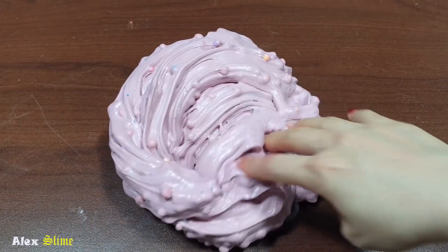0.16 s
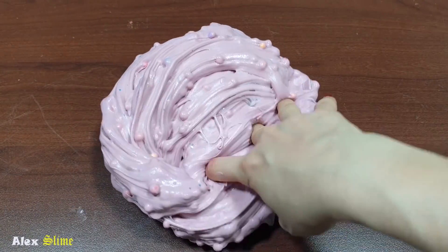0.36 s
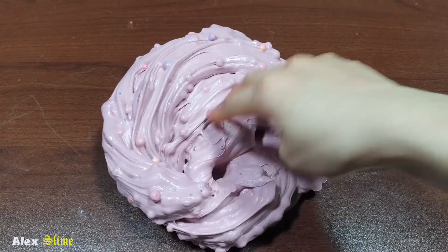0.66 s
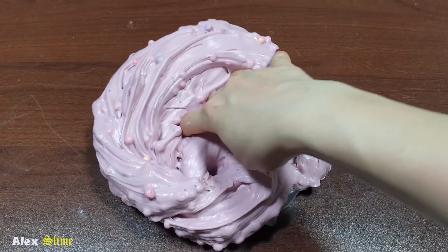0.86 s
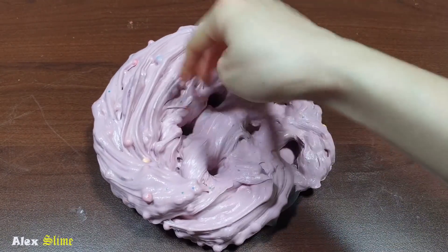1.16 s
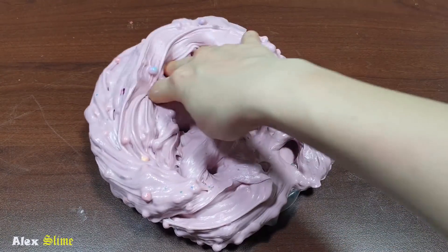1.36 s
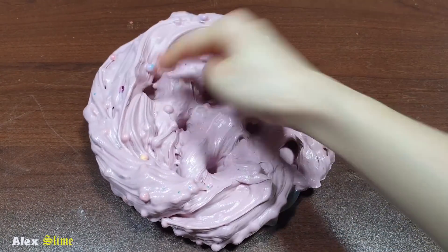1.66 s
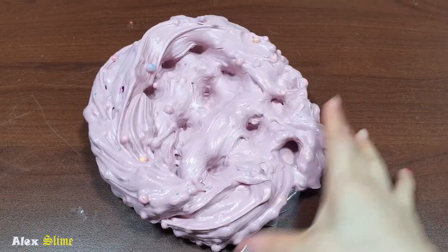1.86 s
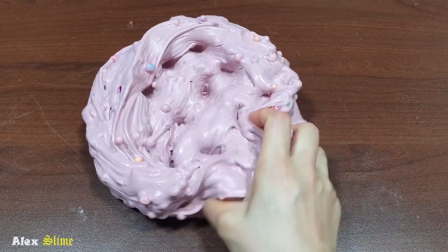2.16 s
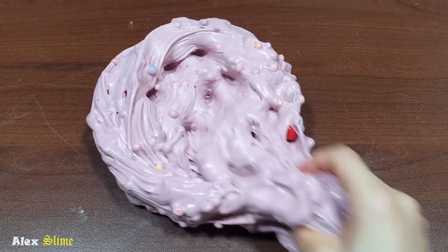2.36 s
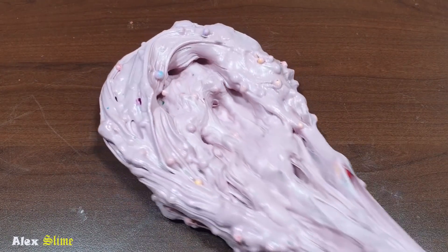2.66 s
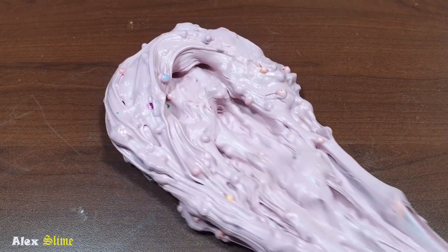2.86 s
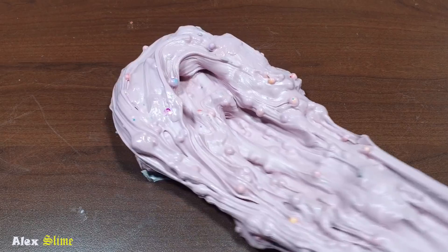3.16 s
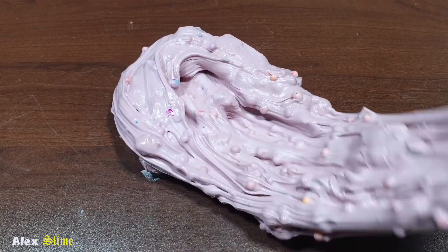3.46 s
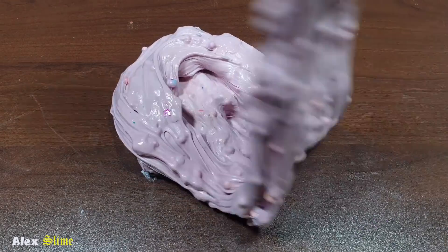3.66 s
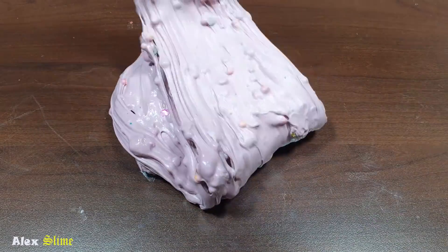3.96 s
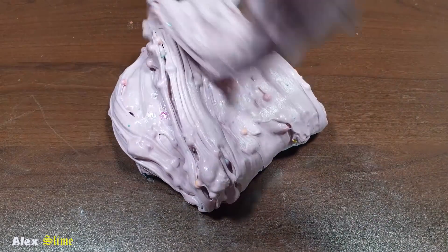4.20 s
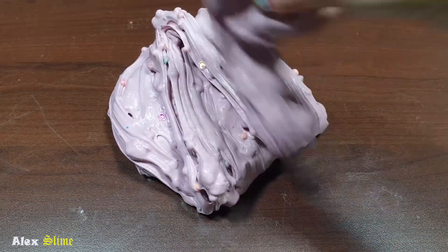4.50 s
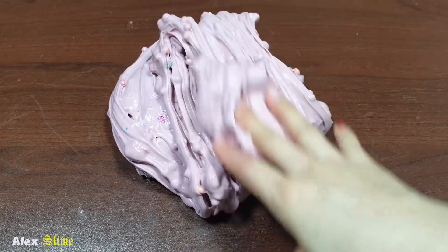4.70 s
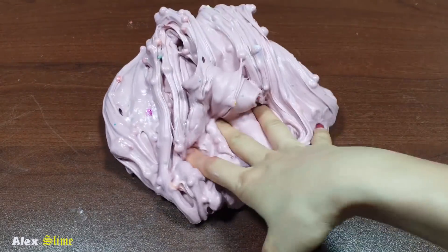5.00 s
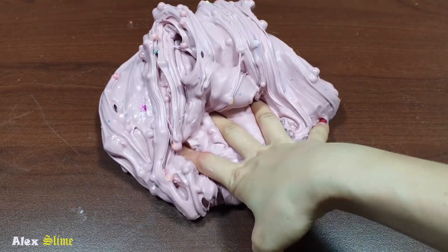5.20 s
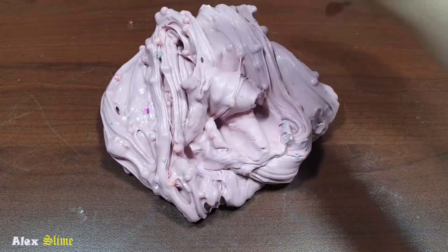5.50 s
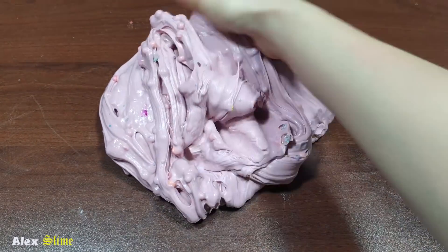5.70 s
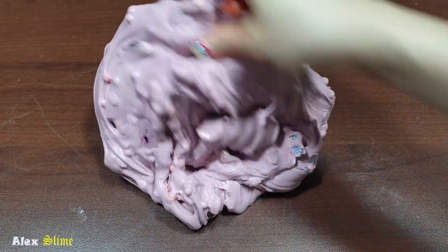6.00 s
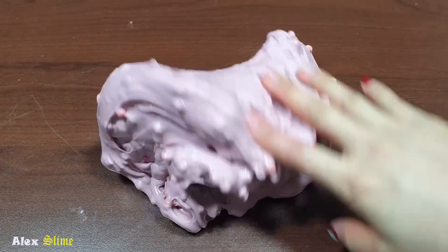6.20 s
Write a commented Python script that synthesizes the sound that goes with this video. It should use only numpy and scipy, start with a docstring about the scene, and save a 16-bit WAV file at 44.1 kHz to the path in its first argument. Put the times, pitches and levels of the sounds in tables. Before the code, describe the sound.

Hands poke, stretch and fold sticky beaded slime up close, with wet crackles, sharp snaps, bubbly pops and soft low thuds in a small room.

```python
"""Sticky beaded slime is poked, pulled and folded by hand on a wooden table in a small room.
Its crackle, bubbling and squish are random ruptures ringing resonances, gated by the hand strokes.
Squelches are gated noise bands; snaps are filtered clicks; pops and thuds are decaying sines.
A fingertip squeaks once as a gliding sine; hum lines, a swelling drone and shaped noise lie beneath."""
import sys
import numpy as np
from scipy import signal
from scipy.fft import rfft, irfft
from scipy.io import wavfile
from scipy.ndimage import uniform_filter1d

SR = 44100
rng = np.random.default_rng(int(sys.argv[2]) if len(sys.argv) > 2 else 0)


def wav_record(signal):
    """Record a signal, one row per channel, as 16-bit PCM in the file named by sys.argv[1]."""
    frames = np.transpose(np.atleast_2d(signal))
    bounded = np.clip(frames, -1, 1)
    # unit amplitude maps onto the largest positive 16-bit level
    quanta = np.round(bounded * 32767).astype(np.int16)
    wavfile.write(sys.argv[1], SR, quanta)


N = 279900
FREQS = np.fft.rfftfreq(N, 1 / SR) + 1e-3  # offset avoids division by zero
TIME = np.arange(N) / SR


def amp(db):
    """Decibels to gain."""
    return 10 ** (np.asarray(db) / 20)


def unit(x):
    """Scales to an rms of one."""
    return x / np.sqrt(np.mean(x ** 2) + 1e-20)


def read(points, hz):
    """Reads a spectrum on a log-frequency axis."""
    f, value = np.transpose(points)
    return np.interp(np.log(hz + 1), np.log(f + 1), value)


def curve(rows, column):
    """One column of a time table at every sample."""
    rows = np.asarray(rows)
    return np.interp(TIME, rows[:, 0], rows[:, column])


def sides(pan_db):
    """Left and right gains for a left-over-right level difference."""
    return amp(np.array([[1], [-1]]) * pan_db / 2)


def add(mix, s, sound):
    """Mixes a stereo sound in at time s."""
    start = max(round(s * SR), 0)
    part = mix[:, start:start + sound.shape[1]]
    part += sound[:, :part.shape[1]]


def resonance(f, hz, q):
    """Complex response of one damped resonance."""
    return 1 / (1 + 1j * q * (f / hz - hz / f))


def ports(f, lag):
    """Two microphones; the left one hears the sound lag samples earlier."""
    return np.exp(-2j * np.pi * f * np.array([[0], [lag]]) / SR)


def steadied(x, size):
    """Evens out the slow level and leaves the fine grain."""
    power = uniform_filter1d((x ** 2).mean(0), size)
    return x / np.sqrt(abs(power) + 1e-12)


def kneading():
    """Sticky surfaces part: pockets squish, bubbles tick, threads crackle and fizz."""
    # rupture colours: f/Hz, level/dB
    squish_colour = [(60, -28.5), (190, -15.5), (380, 2), (550, 3.5), (1200, -17.5)]
    bubble_colour = [(450, -16), (800, -2.5), (1200, 5), (2000, 1), (2800, 3), (6000, -37.5)]
    crackle_colour = [(1800, 4.5), (3000, 0), (4700, 3), (7000, 4.5), (9000, 6.5), (13000, -12)]
    fizz_colour = [(5000, -15.5), (7500, -10.5), (9200, -17.5), (11000, -5), (13500, -0.5), (16000, -4.5)]
    squishing, bubbling, crackling, fizzing = efforts()
    squish = squishing * grains(squish_colour, 150, 685, per_s=300, spread_db=2.0, q=2.3, wash=0.3)
    bubbles = bubbling * grains(bubble_colour, 850, 2400, per_s=450, spread_db=4, q=6, wash=0.15)
    crackle = crackling * grains(crackle_colour, 2470, 6500, per_s=2200, spread_db=2.5, q=7.3, wash=0.64)
    fizz = fizzing * grains(fizz_colour, 7300, 11400, per_s=5000, spread_db=4.5, q=6.1, wash=0.4)
    return squish + bubbles + crackle + fizz


def efforts():
    """Every stroke swells and dies away; gives the gains of squish, bubbles, crackle and fizz."""
    # strokes: t at full effort/s, rise/s, fall/s, crackle/dB, bubbles re crackle/dB, fizz re crackle/dB
    presses = [(0.005, 0.012, 0.033, -58, -0.5, 1), (0.135, 0.0042, 0.02, -69, 7, 9),
               (0.345, 0.044, .06, -61.5, -6, 2.5), (1.48, 0.057, 0.066, -68.5, 9, 3.5),
               (2.357, 0.0049, 0.022, -49, 0.5, 3), (5.13, .003, 0.035, -55.5, -3, 1.5),
               (5.325, 0.014, 0.017, -65, -3, 12), (5.671, 0.008, 0.065, -55.5, 2.5, -3),
               (5.724, 0.017, 0.054, -46, -5.5, -4), (5.856, 0.011, 0.087, -51.5, 3, 3),
               (6.1, 0.016, 0.016, -52.5, -8.5, 1.5)]  # hand pushes in
    pulls = [(0.06, 0.012, 0.022, -60.5, -5, 2), (0.56, 0.011, .03, -69.5, -7, 15),
             (0.88, 0.27, 0.16, -78.5, 0.5, 11.5), (1.645, 0.017, 0.064, -64, 8.5, 11),
             (2.085, 0.013, 0.3, -57, -0.5, 3), (2.225, 0.062, 0.045, -53.5, 3, 1.5),
             (2.44, 0.065, .07, -62, 1.5, 3), (2.69, 0.063, 0.056, -74, 8, 10),
             (2.95, 0.0095, 0.035, -72, -1.5, 8), (3.17, 0.12, 0.1, -75.5, -4.5, 6),
             (3.385, 0.02, 0.043, -73, -18, 15), (3.665, 0.021, 0.029, -70, -21, 7),
             (3.77, 0.042, 0.03, -68, -12, 6), (3.982, .002, .032, -73, 14.5, -12),
             (4.195, 0.014, 0.012, -69.5, -2, 7), (4.57, 0.011, 0.13, -71.5, 3, 13.5),
             (4.81, 0.031, 0.017, -64, -7.5, -6), (4.865, 0.017, 0.066, -74, 1.5, 12.5),
             (5.1, 0.065, 0.057, -74.5, -2, 11.5), (6.165, 0.018, .025, -60, -5, 3),
             (6.31, 0.073, 0.065, -74.5, 2, 14)]  # drier strokes: slime stretches or peels, a squelch starts hissing, a plop bubbles out
    press_squish_db, pull_squish_db = -3.5, -12.5  # re bubbles
    power = np.zeros((4, N))
    for strokes, squish_db in ((presses, press_squish_db), (pulls, pull_squish_db)):
        for s, rise_s, fall_s, db, air_db, fizz_db in strokes:
            swell = np.minimum(TIME - s, 0) / rise_s
            decay = np.maximum(TIME - s, 0) / fall_s
            effort = amp(db) * np.exp(swell - decay)
            shares = amp([air_db + squish_db, air_db, 0, fizz_db])
            power += np.outer(shares ** 2, effort ** 2)
    return np.sqrt(power)


def grains(colour, low_hz, high_hz, per_s, spread_db, q, wash, count=16):
    """Countless tiny ruptures at several spots, each spot with its own pitch and path to the microphones."""
    # stereo lean of the slime: f/Hz, left re right/dB
    lean = [(1000, 2), (2500, 2), (5500, 4), (9000, -2.5), (14000, -7.5)]
    total = 0
    for hz in np.geomspace(low_hz, high_hz, count):
        size_db = spread_db * np.minimum(rng.exponential(1, N), 3.5)
        size = amp(size_db) * rng.choice([-1, 1], N)
        train = size * (rng.random(N) < per_s / count / SR)
        path = ports(FREQS, rng.normal(1.5, 2.47))
        total = total + rfft(train) * resonance(FREQS, hz, q) * path / np.sqrt(hz)
    shape = amp(read(colour, FREQS)) * sides(read(lean, FREQS))
    # ruptures too small to tell apart
    blur = unit(irfft(rfft(rng.standard_normal((2, N))) * shape, N))
    return steadied(unit(irfft(total * shape, N)) + wash * blur, size=900)


def squelches():
    """Air forces a wet gap open: it hisses and sputters while the emptying pocket booms."""
    # air leaving a fold: t at full flow/s, hold/s, rise/s, fall/s, pocket f/Hz,
    # pocket level/dB, sputter level/dB, hiss level/dB
    folds = [(0.578, 0.038, 0.0048, 0.017, 385, -48.5, -48, -42.5),
             (1.147, 0.02, .012, 0.022, 365, -44, -42.5, -40.5),
             (1.66, 0.03, 0.0047, 0.014, 436, -47.5, -45.5, -44),
             (5.341, 0.026, 0.008, 0.026, 273, -48, -47, -41)]
    # colours of the escaping air: f/Hz, level/dB
    hiss_colour = [(1800, -54.5), (3300, -10.5), (5500, -8), (7300, -4.5), (9200, -5.5), (11500, 0.5),
                   (14000, 1), (16000, -8)]
    sputter_colour = [(400, 22.5), (750, -11.5), (1200, -1), (1550, -5.5), (2000, -4), (2900, 1.5),
                      (4000, -14), (7000, -55.5)]
    # pocket colour: f re pocket f/ratio, level/dB
    pocket_colour = [(.3, -38), (.6, -9.5), (1, 1.5), (1.7, -4.5), (2.5, -13), (5, -23)]
    hiss = grains(hiss_colour, 2100, 11200, per_s=9800, spread_db=4.0, q=2.1, wash=0.25)
    sputter = grains(sputter_colour, 760, 3500, per_s=1500, spread_db=3.5, q=7.7, wash=0.14)
    out = np.zeros((2, N))
    for s, hold_s, rise_s, fall_s, hz, pocket_db, sputter_db, hiss_db in folds:
        swell = np.minimum(TIME - s, 0) / rise_s
        decay = np.maximum(TIME - s - hold_s, 0) / fall_s
        flow = np.exp(swell - decay)
        noise = rfft(rng.standard_normal(N))
        boom = noise * amp(read(pocket_colour, FREQS / hz)) * ports(FREQS, 5.9)
        pocket = steadied(unit(irfft(boom, N)), size=600)
        out += flow * (amp(pocket_db) * pocket + amp(sputter_db) * sputter + amp(hiss_db) * hiss)
    return out


def placed_snaps():
    """Single films and threads of slime snapping at set moments; a few narrow, low-pitched rows near 1.5 kHz
    are small bubbles popping."""
    # t/s, rms over 1 ms before pan/dB, f/Hz, Q before the cap in snaps, left re right/dB
    rows = [(0.1313, -36.5, 6230, 4, 8), (0.341, -50.5, 5530, 4, 17), (0.6058, -23.5, 2800, 0.13, 6.5),
            (0.608, -24.5, 5260, 0.24, -6.5), (0.7442, -25.5, 7270, 2.9, 5.5),
            (0.875, -44.5, 6700, 7.8, 16.5), (0.9216, -45, 9100, 3, 19), (1.133, -40.5, 2000, 0.36, 20),
            (1.175, -30.5, 1850, 0.55, 5), (1.4486, -47, 1490, 2.6, 21.5), (2.032, -46.5, 12800, 3.1, 5),
            (2.0694, -39, 1340, 0.18, 9), (2.0827, -36.5, 6200, 3.1, 1), (2.2405, -34.5, 1460, 2.4, 0),
            (2.265, -37.5, 4630, 6.8, 8), (2.31, -40, 1090, 0.69, 6), (2.426, -38.5, 5270, 4.6, 7.5),
            (2.482, -43, 13100, 1.2, 3), (2.511, -44, 2740, 1.5, 9.5), (3.1688, -50, 11600, 10, -21),
            (3.271, -52, 11740, 3.5, -11), (4.5661, -38.5, 11300, 3.5, 8.5),
            (4.8585, -52.5, 2530, 0.073, 20.5), (5.0372, -51, 11510, 3.8, -13), (5.08, -49, 9700, 4.9, 5),
            (5.1273, -35, 5260, 0.14, 12.5), (5.1713, -39.5, 5200, 1.2, 1), (5.7962, -39, 2380, 3.5, 5),
            (6.2259, -39, 4740, 5.2, 6.5)]
    return list(rows)


def stray_threads(scatter=0.35, width_db=9, count=400):
    """Scattered single snaps at random moments, pitches and places, stronger where the fizz is stronger."""
    threads_per_s, thread_hz, thread_q = 30, 9240, 2.1
    # base level at -60 dB of fizz, dB gained per dB of fizz, random level spread
    thread_db, follow, spread_db = -53, 0.66, 3.5
    gap, size = rng.exponential(1, (count, 2)).T
    detune, place = rng.standard_normal((count, 2)).T
    s = np.cumsum(gap) / threads_per_s
    fizz = np.interp(s, TIME, efforts()[3])
    fizz_db = 20 * np.log10(fizz + 1e-12) + 60  # re -60 dB
    db = thread_db + follow * fizz_db + spread_db * np.minimum(size, 2)
    hz = thread_hz * np.exp(scatter * detune)
    rows = zip(s, db, hz, np.full(count, thread_q), width_db * place)
    return [row for row in rows if row[0] < TIME[-1]]


def snaps(rows, tear_s=0.0011, tear=0.26, size=1024):
    """A film breaks with a click and a short ragged tear, ringing its tiny cavity."""
    out = np.zeros((2, N))
    t = np.arange(size) / SR
    f = np.fft.rfftfreq(size, 1 / SR) + 1
    for s, db, hz, q, pan_db in rows:
        push = tear * rng.standard_normal((2, size)) * np.exp(-t / tear_s)
        push[:, 0] += 1
        cavity = resonance(f, hz, min(q, 3.5))
        click = irfft(rfft(push) * cavity * ports(f, 2.1), size)
        # unit rms if all the energy fell within 1 ms
        click /= np.sqrt((click ** 2).sum(1, keepdims=True) * 1000 / SR)
        add(out, s, amp(db) * sides(pan_db) * click)
    return out


def pops():
    """Air bubbles burst, singly and in a run, each a brief ring of its cavity."""
    # single bubbles: t/s, envelope peak/dB, f/Hz, decay/cycles
    rows = [(.018, -43, 1090, 0.57), (.5695, -41.5, 780, 0.8), (1.1481, -15, 2120, 0.42),
            (1.426, -50, 1290, 1.8), (1.462, -47, 1860, 1.2), (1.527, -50, 1500, 1.4),
            (1.607, -50.5, 1300, 1.7), (1.626, -45, 1317, 1.8), (2.157, -34, 1440, 1.7),
            (2.160, -31.5, 1240, 0.76), (2.163, -36, 940, 1.1), (2.177, -40, 840, 0.83),
            (2.234, -42, 2700, 0.8), (2.2135, -39, 504, 0.41), (2.572, -43.5, 1660, 0.49),
            (2.9405, -49, 1200, 0.27), (3.9762, -38, 1250, 1), (3.978, -43.5, 2820, 0.48),
            (3.991, -43, 1400, 0.76), (4.566, -52, 1580, 2.1), (5.1266, -32.5, 825, 0.23),
            (5.95, -41, 640, 0.46)]
    return bursts(list(rows) + bubble_run(), glide=0.038)


def bubble_run(jitter_s=0.00106, scatter=0.19, count=7):
    """Nearly evenly spaced small pops that swell and fade as the slime draws out."""
    start_s, gap_s = 2.6275, 0.025
    middle_db, end_fade_db, centre_hz, decay_cycles = -46, -5.5, 1330, 0.43
    late, detune = rng.standard_normal((count, 2)).T
    s = start_s + gap_s * np.arange(count) + jitter_s * late
    db = middle_db + end_fade_db * np.linspace(-1, 1, count) ** 2
    hz = centre_hz * np.exp(scatter * detune)
    return list(zip(s, db, hz, np.full(count, decay_cycles)))


def thuds():
    """Large pockets collapse under the hand, each a low ring of its cavity."""
    # t/s, envelope peak/dB, f/Hz, decay/cycles
    rows = [(.6105, -35.5, 364, 0.61), (1.154, -32, 338, 0.55), (1.681, -36.5, 520, 1),
            (5.1265, -36.5, 147, 0.12), (5.3595, -29.5, 275, 0.6), (5.663, -30, 172, 0.2),
            (5.745, -37.5, 211, 0.55), (5.866, -35.5, 362, 0.68)]
    return bursts(rows, glide=0.027)


def bursts(rows, glide, size=4096):
    """An opened air cavity rings briefly, its pitch rising as the hole widens."""
    out = np.zeros((2, N))
    lag = np.array([[0], [4]])  # samples, right side later
    t = np.maximum(np.arange(size) - lag, 0) / SR
    for s, db, hz, cycles in rows:
        age = t * hz / cycles
        envelope = age * np.exp(1 - age)  # peaks at one
        turns = hz * t * (1 + glide * np.tanh(age / 10))
        add(out, s, amp(db) * envelope * np.sin(2 * np.pi * turns))
    return out


def squeak():
    """Skin sticks and slips on the slime in a thin tone that dips, then rises."""
    # sliding fingertip: t/s, f/Hz, rms level before pan/dB
    slide = [(4.78, 1370, -83), (4.795, 1304, -67), (4.812, 1340, -61), (4.835, 1430, -71),
             (4.855, 1484, -60), (4.875, 1530, -89)]
    flutter = unit(uniform_filter1d(rng.standard_normal(N), 100))
    hz = curve(slide, 1) * (1 + 0.009 * flutter)
    sliding = (TIME > slide[0][0]) & (TIME < slide[-1][0])
    tone = np.sqrt(2) * np.sin(2 * np.pi * np.cumsum(hz) / SR)
    return sliding * amp(curve(slide, 2)) * tone


def room(x, first_s=0.0044, shared_hz=600, size=32768):
    """Dense reflections from nearby walls, each band dying at its own speed; both microphones share the bass."""
    # decay: f/Hz, t60/s
    decay = [(150, 0.7), (500, 0.44), (1000, 0.26), (2800, 0.22), (7300, 0.3), (15000, 0.25)]
    # reverberation strength: f/Hz, level/dB
    strength = [(100, 7), (500, -8.5), (850, -6.5), (1400, -3.5), (4000, -8.5), (8000, -8.5), (15000, -10)]
    t = np.arange(size) / SR
    taps = rng.standard_normal((3, size)) * (rng.random((3, size)) < 0.25) * (t > first_s)
    hz, at, z = signal.stft(unit(taps), SR, nperseg=256)
    shared = 1 / (1 + (hz[:, None] / shared_hz) ** 2)
    z = np.sqrt(shared) * z[0] + np.sqrt(1 - shared) * z[1:]
    t60 = read(decay, hz)[:, None]
    even_energy = np.sqrt(2 * np.log(1000) / (t60 * SR))  # offsets the decay length
    z = z * 1000 ** (-at / t60) * even_energy * amp(read(strength, hz))[:, None]
    response = signal.istft(z, SR, nperseg=256)[1]
    return signal.fftconvolve(x, response, axes=1)[:, :N]


def background():
    """Low hum and rumble shared by both microphones, under a faint separate hiss."""
    # still-room colour: f/Hz, level/dB
    floor = [(22, -37), (33, -24), (46, 5), (110, 0.5), (200, -6.5), (400, -12.5), (800, -16.5),
             (2000, -22), (5000, -27), (9500, -30), (13500, -22.5), (16000, -28.5)]
    # hum lines: f/Hz, rms level before pan/dB
    hum_lines = [(46.5, -76.5), (107.3, -72.5), (161, -80.5)]
    # swelling low drone: t/s, level before pan/dB
    drone_level = [(0.0, -72), (0.16, -60), (0.3, -75), (0.46, -60.5), (0.83, -86), (1.25, -52.5),
                   (1.29, -73), (1.57, -58), (1.62, -66.5), (3.0, -76.5), (4.19, -72), (4.33, -58),
                   (4.74, -67), (5.02, -50.5), (6.26, -50), (6.35, -53.5)]
    floor_db, drone_hz = -69, 65.4
    noise = rfft(rng.standard_normal((3, N)))
    shared = 1 / (1 + (FREQS / 700) ** 2)
    mixed = np.sqrt(shared) * noise[0] + np.sqrt(1 - shared) * noise[1:]
    air = irfft(mixed * amp(read(floor, FREQS)), N)
    hum = sum(amp(db) * wavering(hz, waver=0.2) for hz, db in hum_lines)
    drone = amp(curve(drone_level, 1)) * wavering(drone_hz, waver=0.14)
    return sides(3.1) * (amp(floor_db) * unit(air) + hum + drone)


def wavering(hz, waver):
    """A hum line whose level and phase drift."""
    drift = irfft(rfft(rng.standard_normal((2, N))) * np.exp(-(FREQS / 21.0) ** 2), N)
    a, b = waver * unit(drift)
    phase = 2 * np.pi * (hz * TIME + rng.random())
    return unit((1 + a) * np.sin(phase) + b * np.cos(phase))


def scene():
    """The slime close to the microphones, the room around it."""
    # where the slime is worked: t/s, left re right/dB
    place = [(0, 4), (2.4, 4), (2.8, 2), (3.2, -5), (3.7, 2.5), (6.3, 4.5)]
    body = kneading() + squelches() + pops() + thuds() + squeak()
    body = body * sides(curve(place, 1))
    clicks = snaps(placed_snaps() + stray_threads())
    slime = body + clicks
    return slime + room(slime) + background()


def record(dry):
    """Linear-phase low-pass that limits the band."""
    edge_hz = 16100
    lowpass = signal.firwin(255, edge_hz, window=("kaiser", 8), fs=SR)
    return signal.oaconvolve(dry, lowpass[None], "same")


dry = scene()
out = record(dry)
wav_record(out)
```